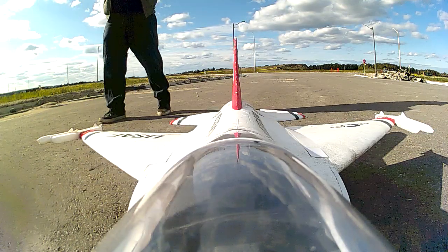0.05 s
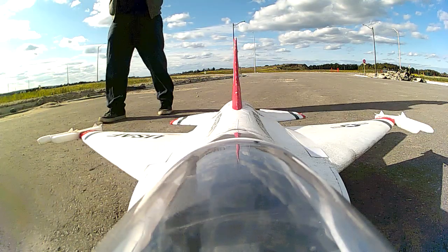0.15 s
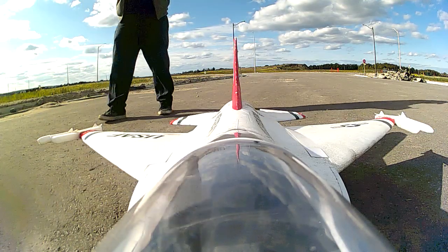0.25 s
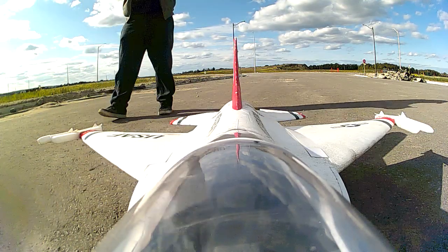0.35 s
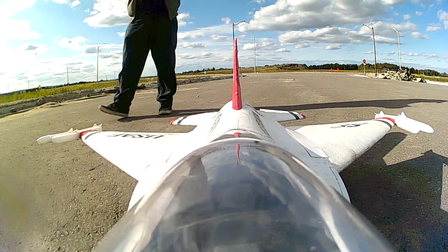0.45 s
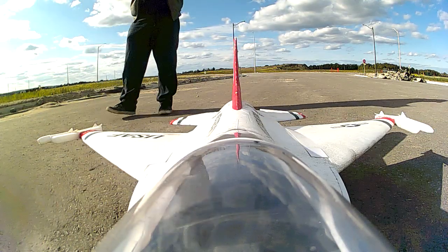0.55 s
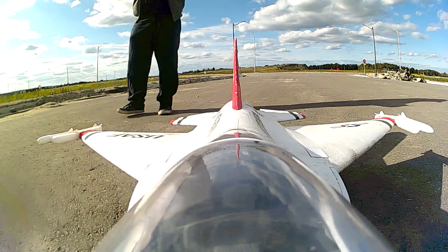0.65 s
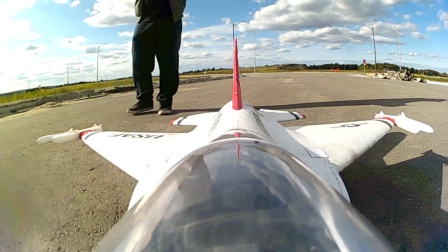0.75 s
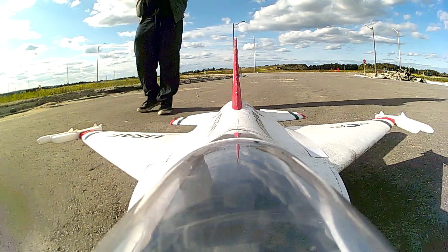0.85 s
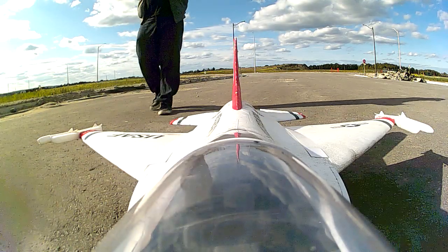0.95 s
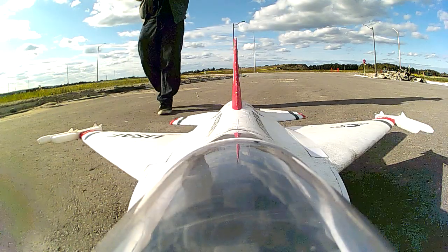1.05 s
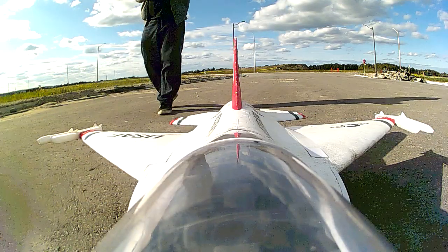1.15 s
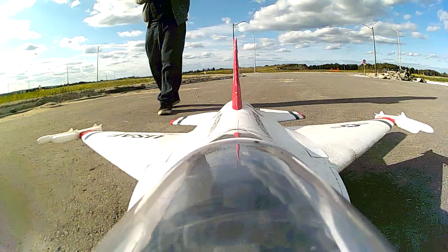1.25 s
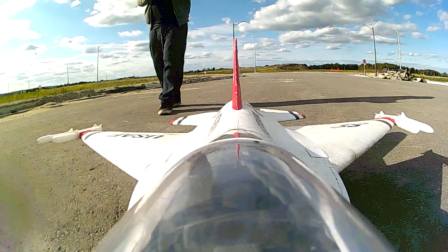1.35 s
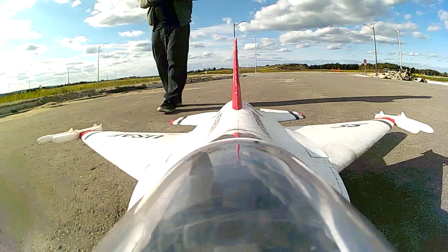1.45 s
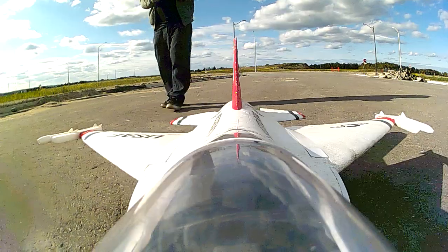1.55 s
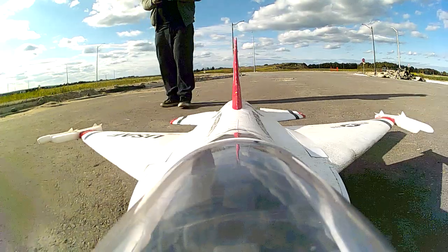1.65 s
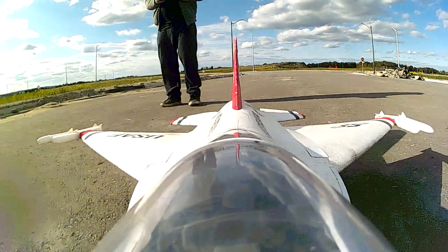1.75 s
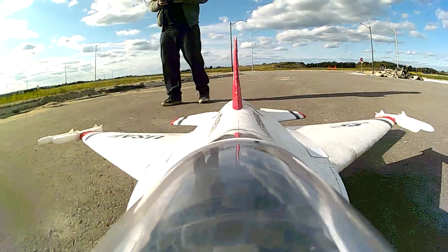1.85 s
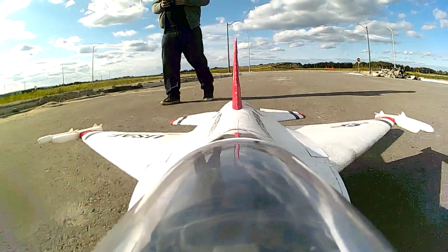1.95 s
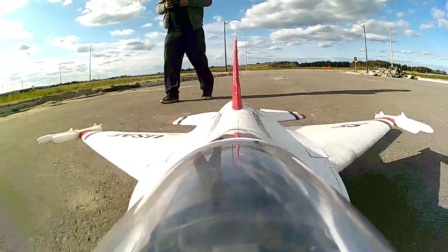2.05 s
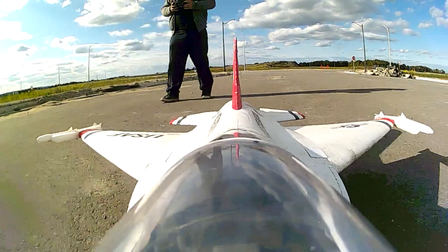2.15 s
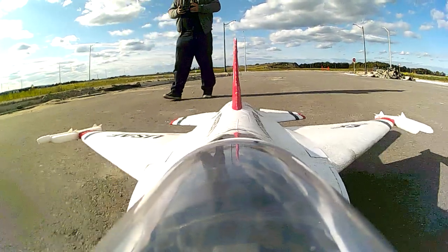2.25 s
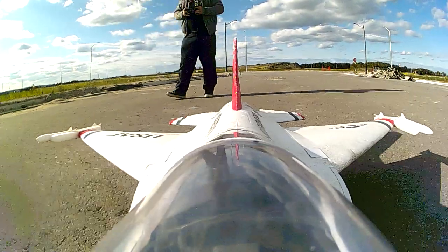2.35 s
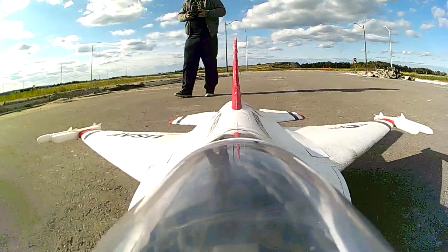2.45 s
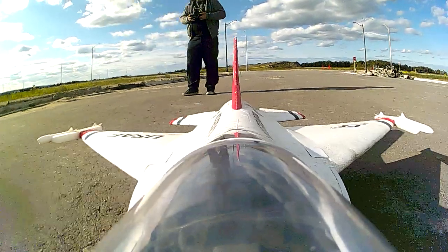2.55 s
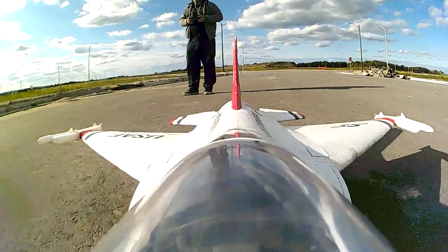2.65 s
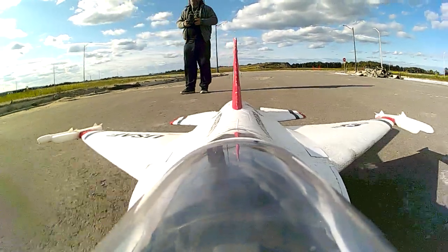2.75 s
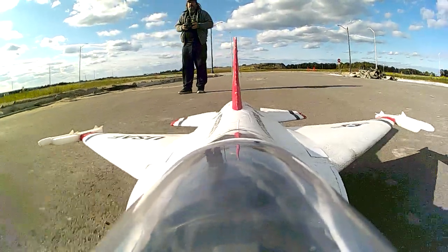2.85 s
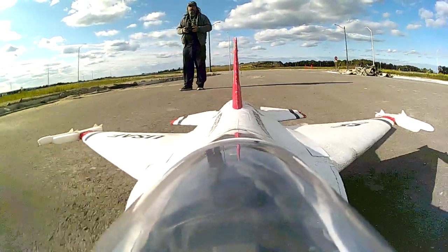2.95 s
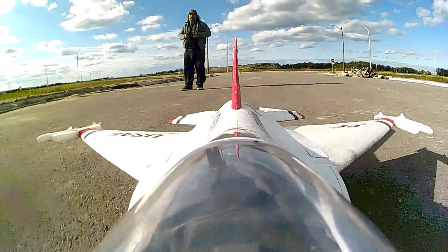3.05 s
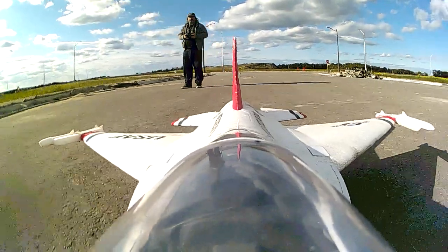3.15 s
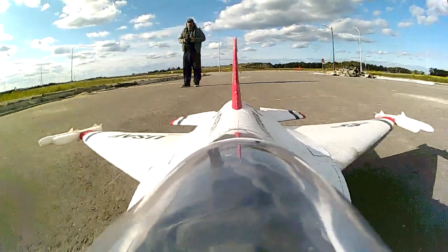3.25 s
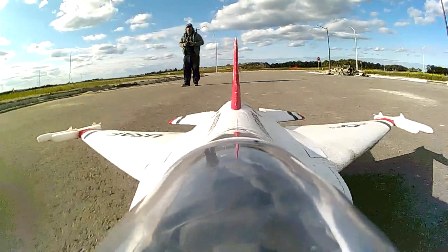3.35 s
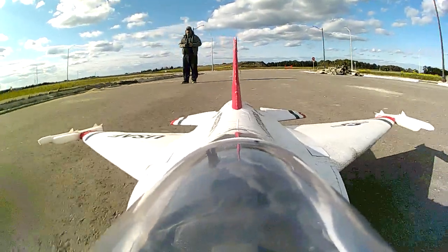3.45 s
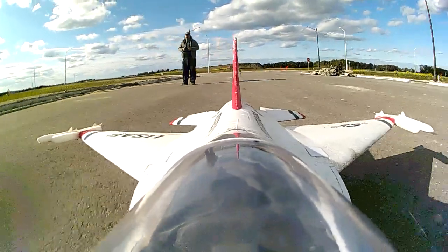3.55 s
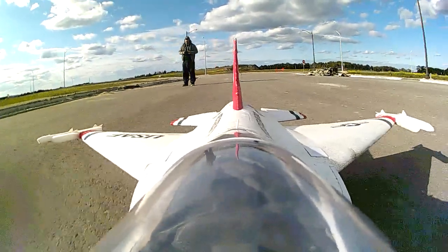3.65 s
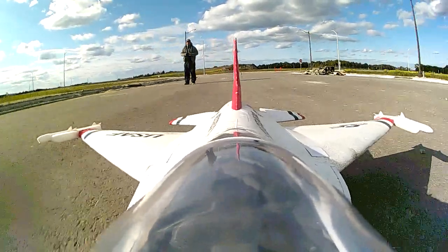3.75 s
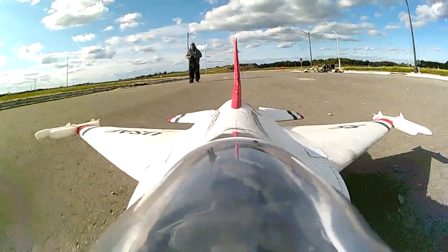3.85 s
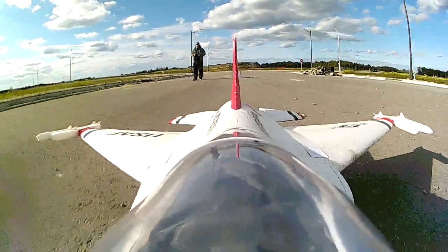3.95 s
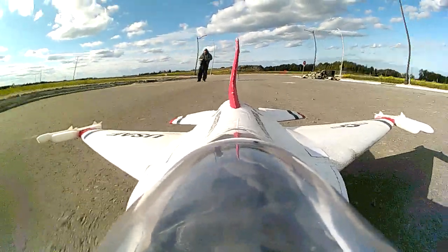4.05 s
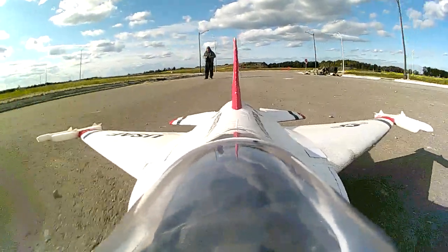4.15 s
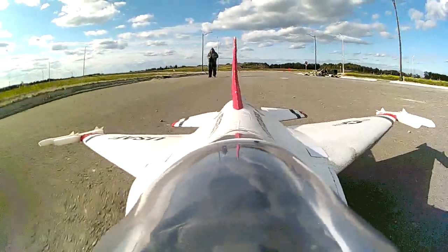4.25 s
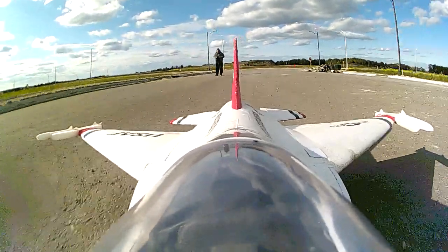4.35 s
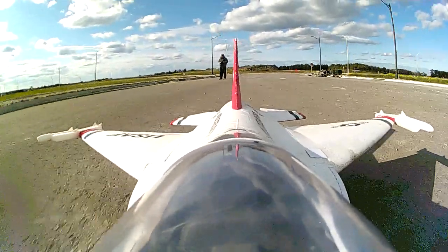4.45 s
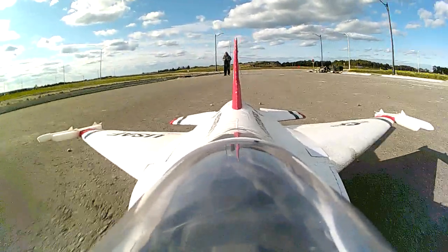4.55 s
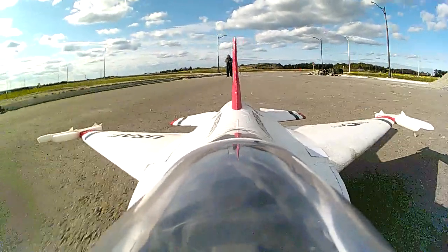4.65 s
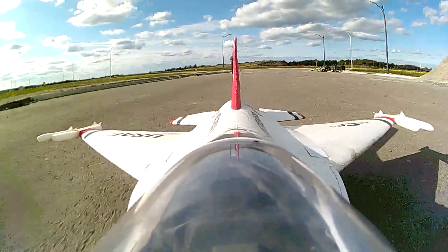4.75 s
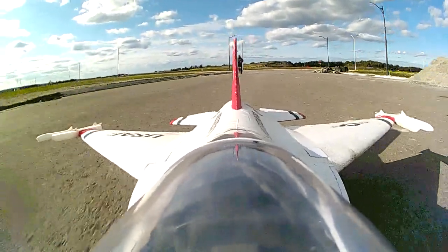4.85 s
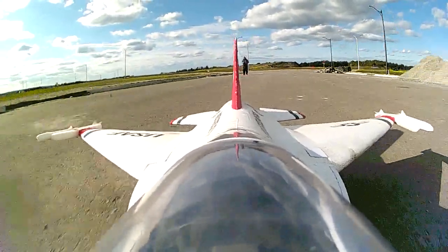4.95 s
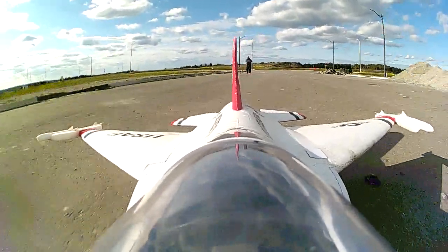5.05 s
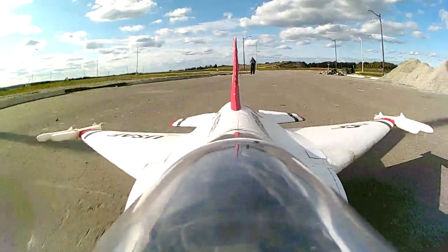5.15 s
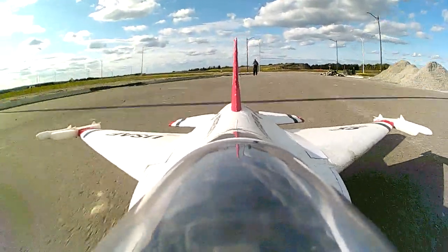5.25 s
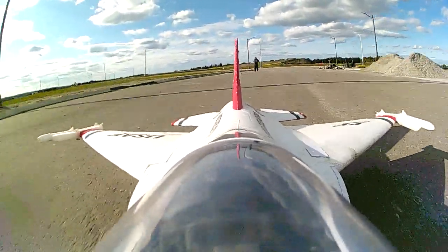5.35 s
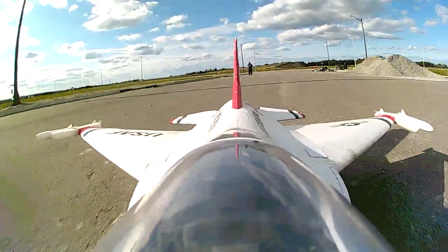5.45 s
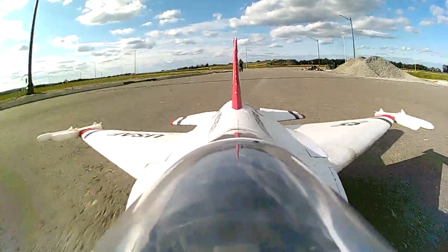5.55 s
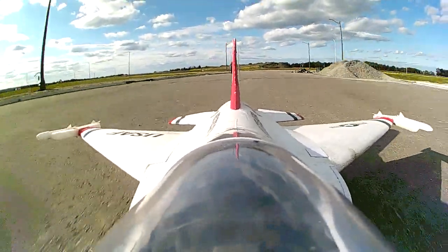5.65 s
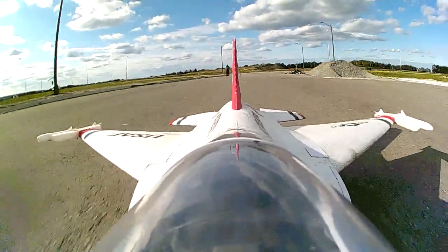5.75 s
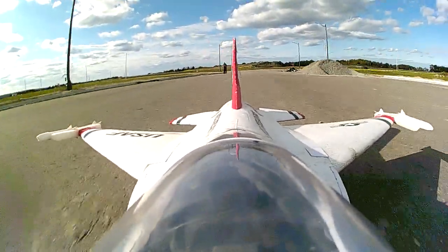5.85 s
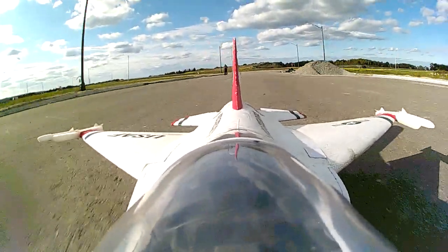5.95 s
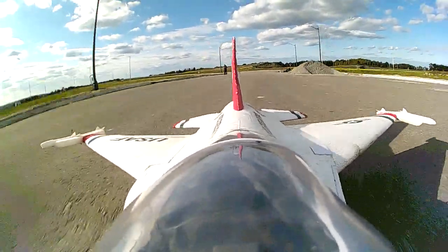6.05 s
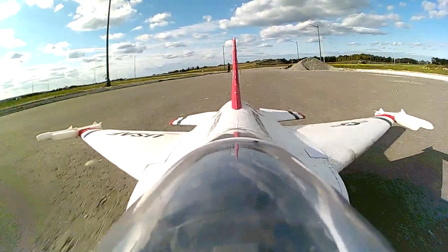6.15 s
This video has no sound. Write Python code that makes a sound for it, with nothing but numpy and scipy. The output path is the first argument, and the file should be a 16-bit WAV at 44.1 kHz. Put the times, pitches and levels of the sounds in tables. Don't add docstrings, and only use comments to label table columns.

```python
import sys
import numpy as np
from scipy import signal
from scipy.fft import rfft, irfft, next_fast_len
from scipy.io import wavfile
from scipy.ndimage import uniform_filter1d

SR = 44100
rng = np.random.default_rng(int(sys.argv[2]) if len(sys.argv) > 2 else 0)


def unload_audio(sound):
    columns = np.transpose(np.atleast_2d(sound))
    steps = np.round(np.clip(columns, -1, 1) * 32767)
    wavfile.write(sys.argv[1], SR, steps.astype(np.int16))


def nominal_scale(level):
    x = np.asarray(level, float) / 20
    return 10 ** x


N = 272979
T = np.arange(N) / SR
CAMERA_HZ = 8000
BLADES, FULL_HZ = 12, 600


def set_rms(x, db):
    return x * nominal_scale(db) / np.sqrt(np.mean(x ** 2))


def band(x, hz, width_hz):
    return signal.lfilter(*signal.iirpeak(hz, hz / width_hz, fs=SR), x)


def noise_band(hz, width_hz, db):
    return set_rms(band(rng.standard_normal(N), hz, width_hz), db)


def steep_noise_band(hz, width_hz, db):
    return set_rms(band(band(rng.standard_normal(N), hz, width_hz), hz, width_hz), db)


def walk(rate_hz):
    hold = int(SR / rate_hz)
    stairs = np.repeat(rng.standard_normal(N // hold + 1), hold)
    return 1.084 * uniform_filter1d(uniform_filter1d(stairs, hold), hold)[:N]


def bell(x, centre, spread):
    return np.exp(-.5 * ((x - centre) / spread) ** 2)


def tone(hz, db, wobble_db, jitter=0.0024):
    phase = np.cumsum(2 * np.pi * hz * (1 + jitter * walk(40)) / SR)
    return np.sqrt(2) * nominal_scale(db) * nominal_scale(wobble_db * walk(45)) * np.sin(phase)


def turbulence(modes, flicker_db, rate_hz):
    total = 0
    for hz, width_hz, db in modes:
        rush = band(band(rng.standard_normal(N), hz, width_hz), hz, 1.66 * width_hz)
        total = total + set_rms(rush, db + flicker_db * walk(rate_hz))
    return set_rms(total, 0)


# start_s, shaft_hz
FAN_SPEED = [(1.14, 24.2), (1.228, 38), (1.338, 49.5), (1.372, 105), (1.418, 210), (1.458, 259),
             (1.53, 286), (1.6, 300), (1.66, 333), (1.71, 357), (1.8, 360.5), (2.5, 364.5), (2.648, 383.5),
             (2.706, 440), (2.872, 607), (3.6, 604.5), (4.84, 595), (6.19, 589)]


def speeds():
    hz = np.interp(T, *np.transpose(FAN_SPEED))
    push = np.cumsum(hz ** 2)
    return hz, push / push[-1]


def law(hz, roll, full_db, slope_db, knee_hz, stall_db, roll_db):
    stall = stall_db * np.minimum(np.log2(hz / knee_hz), 0)
    return full_db + slope_db * np.log2(hz / FULL_HZ) + stall + roll_db * roll


# pitch_hz, level_db (per Hz)
OPEN_AIR = [(15, -31), (25, -2), (79, 3.5), (230, -6), (605, -11.5), (1050, -4), (1220, -11), (4010, -24.5)]


def field():
    hz, db = np.transpose(OPEN_AIR)
    size = next_fast_len(N)
    colour = nominal_scale(np.interp(np.log(np.fft.rfftfreq(size, 1 / SR) + 1), np.log(hz), db))
    far = irfft(rfft(rng.standard_normal(size)) * colour, size)[:N]
    breeze = nominal_scale(3.0 * walk(9)) * noise_band(70, 60, 0)
    return set_rms(far * nominal_scale(.8 * walk(5)), -65.5) + nominal_scale(-75.5) * breeze


# start_s, peak_db, pitch_hz, width_hz, length_s
SCUFFS = [
    (.015, -60, 2290, 600, .03),
    (.025, -58.5, 1350, 400, 0.062),
    (0.047, -53, 670, 160, 0.012),
    (0.1, -54, 2150, 120, .012),
    (0.119, -43.5, 1920, 500, 0.0044),
    (0.16, -50, 360, 400, .002),
    (0.993, -47, 90, 50, 0.02),
    (1.33, -49, 55, 50, .04),
]


def steps():
    grinding = rng.standard_normal(N)
    total = 0
    for s, db, hz, width_hz, length_s in SCUFFS:
        scuff = set_rms(band(band(grinding, hz, width_hz), hz, width_hz), db - 7)
        total = total + bell(T, s, length_s) * scuff
    return total


# pitch_hz, width_hz, level_db
SHELL_MODES = [(418, 98, 3.5), (1230, 220, -18), (1820, 85, 0), (2440, 98, -10)]
# start_s, peak_db, length_s, low_mode_db, upper_mode_db
JERKS = [(1.061, -52, 0.0062, 9, -12), (1.077, -44, .008, 8, -16), (1.096, -41, 0.007, -7, 5),
         (1.105, -34.5, 0.0076, -10, -4), (1.118, -50.5, 0.0091, 15, -12), (1.16, -47, 0.0065, 0, 0),
         (1.23, -47, 0.0086, -10, -14), (1.303, -57, .01, -10, -12), (1.348, -40, 0.014, -6, -6),
         (1.374, -31, 0.0075, -12, 6), (1.383, -26, 0.011, -13, 2)]


def twitches():
    low, body, ring, upper = (steep_noise_band(*mode) for mode in SHELL_MODES)
    jerks = 0
    for s, db, length_s, low_db, upper_db in JERKS:
        shell = nominal_scale(low_db) * low + body + ring + nominal_scale(upper_db) * upper
        jerks = jerks + nominal_scale(db - 11) * bell(T, s, length_s) * shell
    buzz = steep_noise_band(800, 1200, -63) + nominal_scale(-70) * ring
    return jerks + bell(T, 1.2, 0.087) * nominal_scale(3.0 * walk(59.3)) * buzz


# start_s, level_db, length_s
LURCHES = [
    (1.152, -53, 0.013),
    (1.199, -39.5, 0.01),
    (1.227, -40, 0.0085),
    (1.27, -42, 0.01),
    (1.305, -45, .015),
    (1.332, -47, 0.0067),
]


def cogging():
    hz, _ = speeds()
    lurches = sum(nominal_scale(db) * bell(T, s, length_s) for s, db, length_s in LURCHES)
    return tone(BLADES * hz, 0, wobble_db=4.0) * lurches


# pitch_hz, spread_hz, level_db
FAN_MOUNT = [(328, 17, 6.5), (493, 29, 6.5), (596, 16, 5.5)]
# multiple, air_db, shell_db
MULTIPLES = [(2, -13, -36), (3, -24, -40), (6, -55, -4)]


def shaft_hum():
    hz, roll = speeds()
    db = law(hz, roll, full_db=-18.5, slope_db=12, knee_hz=228, stall_db=110, roll_db=-3)
    db = db + sum(lift_db * bell(hz, f, spread_hz) for f, spread_hz, lift_db in FAN_MOUNT)
    db = db + 2.5 * roll ** 2 * walk(25)
    hum = tone(hz, db, wobble_db=1.0, jitter=0.002983)
    fade_db = 10.5 * (hz / FULL_HZ) ** 2
    for k, air_db, shell_db in MULTIPLES:
        multiple = tone(k * hz, db, wobble_db=3.5)
        flare = 0
        for f, width_hz, mode_db in SHELL_MODES[1:]:
            flare = flare + nominal_scale(mode_db) * band(band(multiple, f, 1.5 * width_hz), f, 1.5 * width_hz)
        hum = hum + nominal_scale(air_db - fade_db) * multiple + nominal_scale(shell_db) * flare
    return hum


# pitch_hz, spread_hz, level_db
BLADE_MODES = [(1820, 130, -37), (2520, 100, -36), (2900, 170, -41), (3490, 55, -44), (3660, 110, -45),
               (3930, 120, -42)]


def blade_tone():
    blade_hz = BLADES * speeds()[0]
    path = sum(nominal_scale(db) * bell(blade_hz, f, spread_hz) for f, spread_hz, db in BLADE_MODES)
    whine = tone(blade_hz, 0, wobble_db=3.0, jitter=0.0029) * path
    return whine + nominal_scale(9.5) * band(whine, *SHELL_MODES[2][:2])


# pitch_hz, width_hz, level_db
DUCT_MODES = [(1162, 300, 1), (1404, 430, -3.5), (1891, 375, 2), (2487, 454, 1), (2800, 290, -13.5)]
# full_fan_db, slope_db (per octave), knee_hz, stall_db (more per octave under it), roll_db
DUCT_LEVEL = (-19.5, 11.5, 110, 20, 4.5)
# pitch_hz, width_hz, level_db
INTAKE_MODES = [(325.4, 202, -0.5), (496, 198, 2.5), (684, 226, 0.5)]
# full_fan_db, slope_db (per octave), knee_hz, stall_db (more per octave under it), roll_db
INTAKE_LEVEL = (-29.5, 15.5, 80, 4, 7.5)


def duct_and_intake(hz, roll):
    duct = nominal_scale(law(hz, roll, *DUCT_LEVEL)) * turbulence(DUCT_MODES, flicker_db=1.0, rate_hz=40)
    intake_db = law(hz, roll, *INTAKE_LEVEL) + 7.0
    inner = duct + nominal_scale(intake_db) * turbulence(INTAKE_MODES, flicker_db=0.64, rate_hz=30)
    for gap_hz in (978, .92 * 978):
        inner = inner - 0.6 * band(inner, gap_hz, 120)
    return inner


# pitch_hz, width_hz, level_db
NOZZLE_MODES = [(3320, 510, -6.5), (3957, 400, 4)]
# full_fan_db, slope_db (per octave), knee_hz, stall_db (more per octave under it), roll_db
NOZZLE_LEVEL = (-33, 7, 301, 24, 1)


def nozzle(hz, roll):
    nozzle_db = law(hz, roll ** 3, *NOZZLE_LEVEL) - 3.0
    return nominal_scale(nozzle_db) * turbulence(NOZZLE_MODES, flicker_db=1.5, rate_hz=23)


def rolling_db(hz, roll):
    return -23.5 + 17 * np.log10(roll + 0.013) + 6.0 * np.minimum(np.log2(hz / 210), 0)


# pitch_hz, width_hz, level_db
WHEEL_MODES = [(35, 45, -6.5), (68, 28, -5.5), (114, 60, -2), (194, 160, -0.5)]


def wheels(hz, roll):
    wheel_db = rolling_db(hz, roll) + 1.06 + 0.59 * walk(7)
    return nominal_scale(wheel_db) * turbulence(WHEEL_MODES, flicker_db=0.0, rate_hz=9.2)


def slipstream(hz, roll):
    return nominal_scale(1.332 * rolling_db(hz, roll) + 14) * noise_band(900, 590, 0)


def wind(roll):
    wind_db = -18 + 52.5 * np.log10(np.minimum(roll, 0.76) + 1e-3) + 1.7 * walk(14)
    return nominal_scale(wind_db) * noise_band(3100, 830, 0)


def airflow():
    hz, roll = speeds()
    start_s = 1.34
    gust_db = 0.27 * walk(30) + np.interp(T, [start_s - .01, start_s], [-120, 0])
    flow = duct_and_intake(hz, roll) + nozzle(hz, roll)
    passing = slipstream(hz, roll) + wind(roll) + wheels(hz, roll)
    return nominal_scale(gust_db) * (flow + passing)


# start_s, peak_db, length_s, thud_db
SEAMS = [
    (2.778, -8, 0.0069, -6),
    (4.178, -9, 0.0081, 4),
    (4.359, 7.5, 0.0046, -5),
    (4.998, -11, 0.0036, -15),
    (5.129, -6, 0.0038, -3),
    (5.37, -8, .014, -8.5),
    (6.052, -8, 0.0048, -3.5),
]


def bumps():
    rattle, thud = noise_band(1700, 2100, -10.5), noise_band(260, 140, -11.0)
    total = 0
    for s, db, length_s, thud_db in SEAMS:
        total = total + nominal_scale(db) * bell(T, s, length_s) * (rattle + nominal_scale(thud_db) * thud)
    return total


# start_s, level_db
SHARP_PEAKS = [(2.926, -2.5), (3.253, -2.5), (3.337, -2.5), (3.705, -4.5), (3.726, -5.5), (3.828, 0),
               (3.859, -8), (3.915, -0.5), (3.954, -2.5), (4.0, 0), (4.015, -1), (4.129, -2.5), (4.308, -1.5),
               (4.475, -2), (4.537, -2), (4.557, -3.5), (4.648, -2.5), (4.746, -2.5), (4.872, 5.5), (4.89, -1.5),
               (4.927, -1), (5.224, 1), (5.279, -2), (5.523, 1), (6.065, 0), (6.178, 0)]


def overload_peaks(sound):
    s, db = np.transpose(SHARP_PEAKS)
    at = np.round((np.floor(s * CAMERA_HZ) + .5) / CAMERA_HZ * SR).astype(int)
    hits, sizes = np.zeros(N), np.zeros(N)
    hits[at], sizes[at] = 1, nominal_scale(db)
    lag_s = np.arange(-60, 61) / SR
    jolt = bell(lag_s, 0, .0003)
    knock = np.convolve(sizes, jolt * np.cos(2 * np.pi * 1100 * lag_s), "same")
    return sound * (1 - np.convolve(hits, jolt, "same")) + knock


def scene():
    motor = twitches() + cogging() + shaft_hum() + blade_tone()
    return overload_peaks(field() + steps() + motor + airflow() + bumps())[None]


def lowpass(hz, count):
    return signal.firwin(count, hz, fs=SR * (CAMERA_HZ // 100), window=("kaiser", 9))


def top_cut(x):
    return signal.sosfilt(signal.butter(12, 15870, fs=SR, output="sos"), x)


def record(dry):
    camera_top, converter_top = .69, .71
    up, down = CAMERA_HZ // 100, SR // 100
    low = signal.resample_poly(dry, up, down, axis=1, window=lowpass(4150, count=12001))
    low = np.clip(low, -camera_top, camera_top)
    raised = signal.resample_poly(low, down, up, axis=1, window=lowpass(CAMERA_HZ / 2, count=16001))[:, :N]
    raised = np.pad(raised, ((0, 0), (0, N - raised.shape[1])))
    return top_cut(np.clip(raised, -converter_top, converter_top))


dry = scene()
out = record(dry)
unload_audio(out)
```